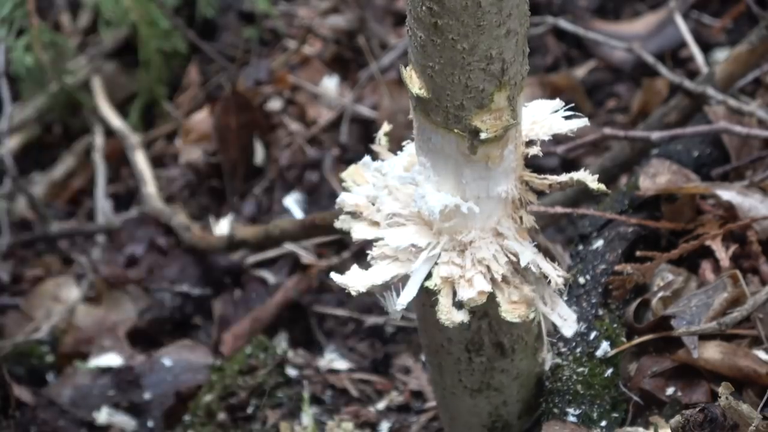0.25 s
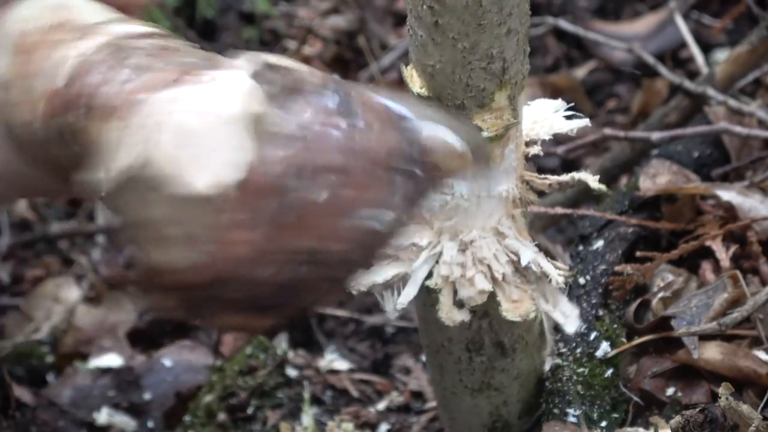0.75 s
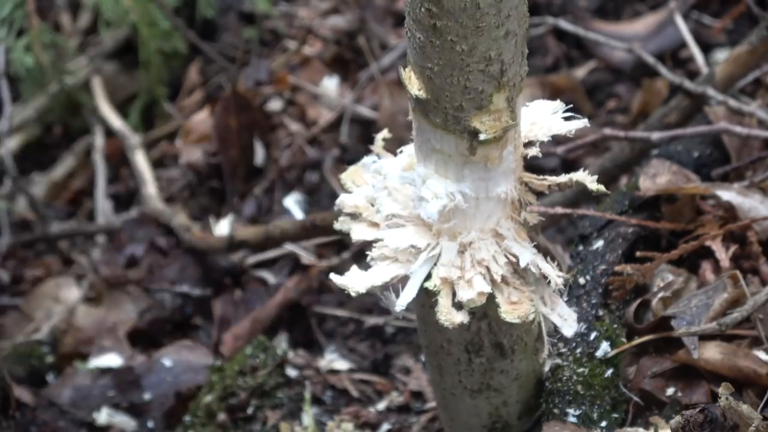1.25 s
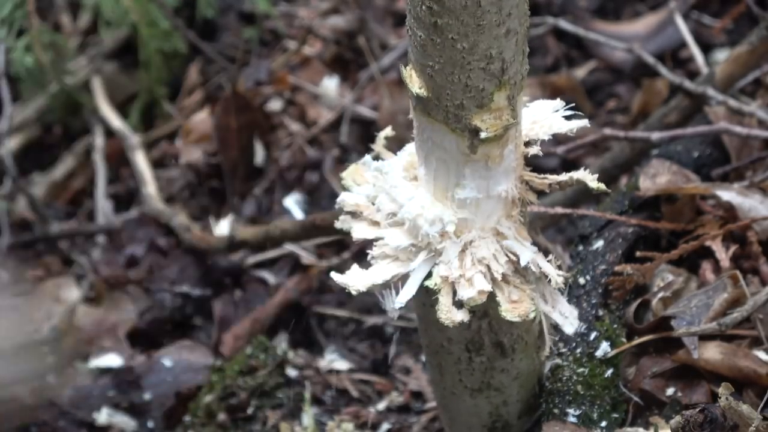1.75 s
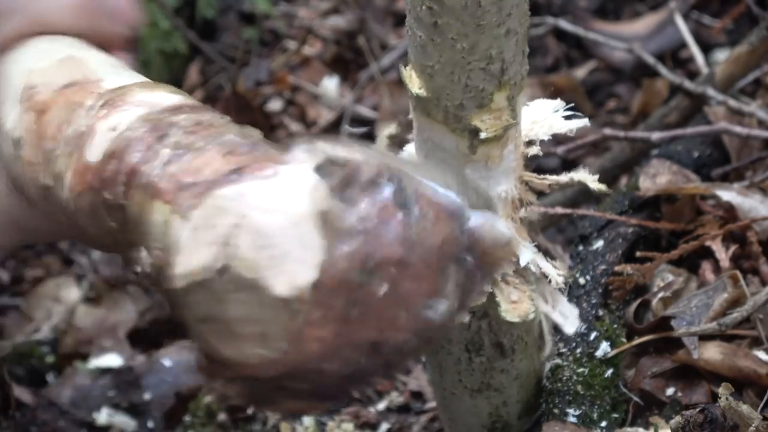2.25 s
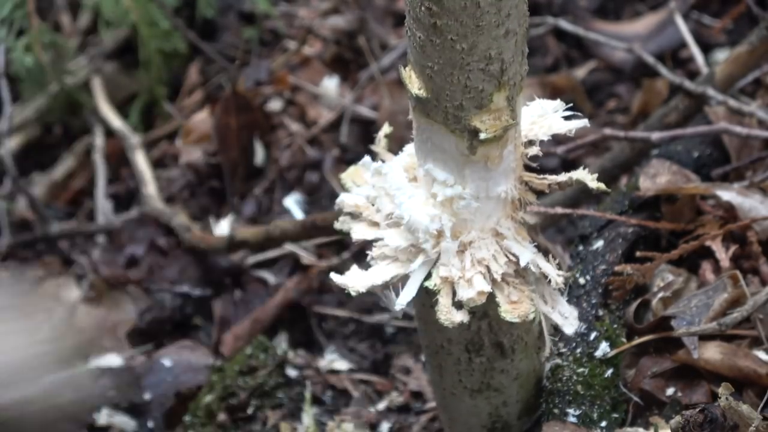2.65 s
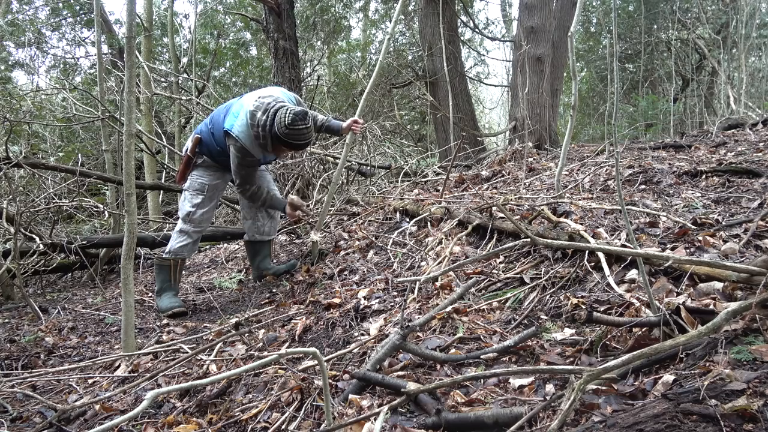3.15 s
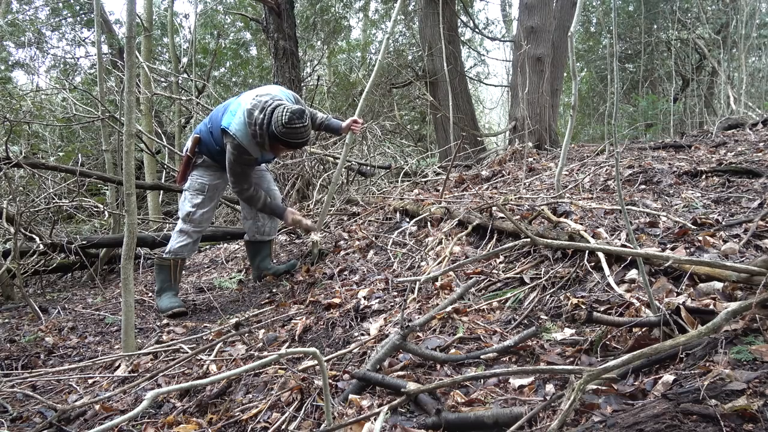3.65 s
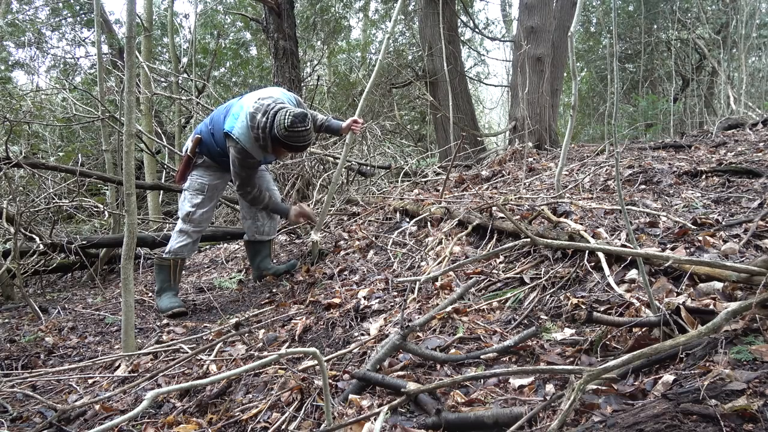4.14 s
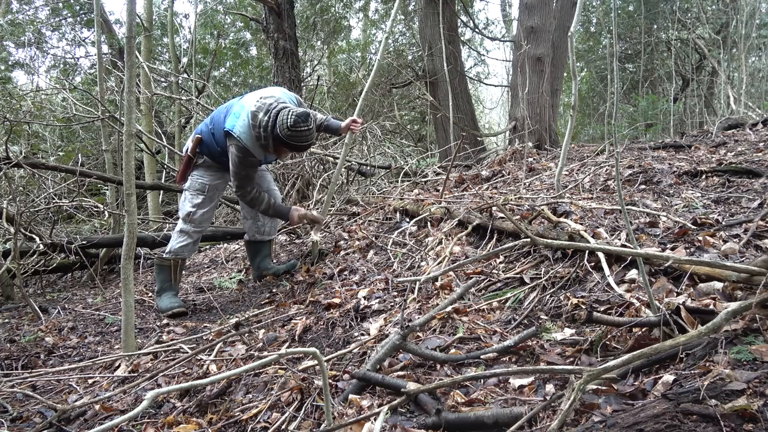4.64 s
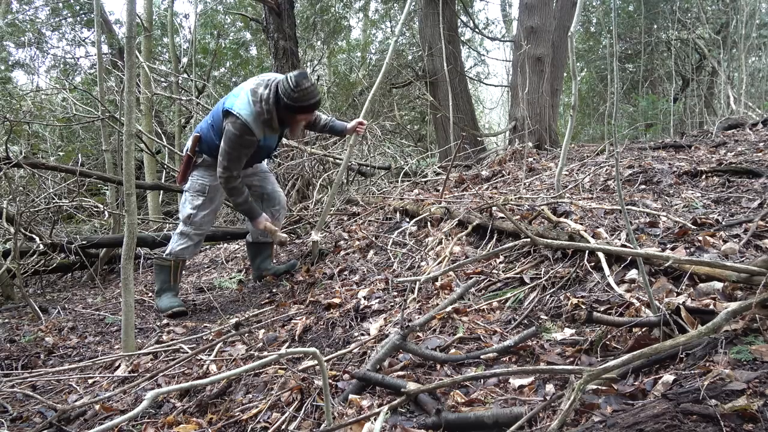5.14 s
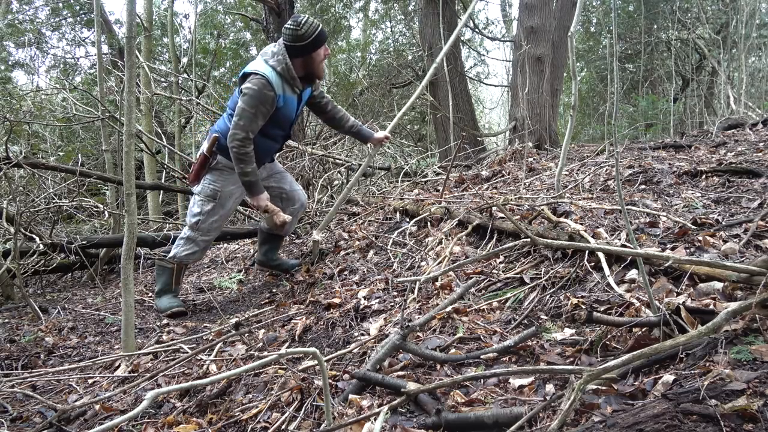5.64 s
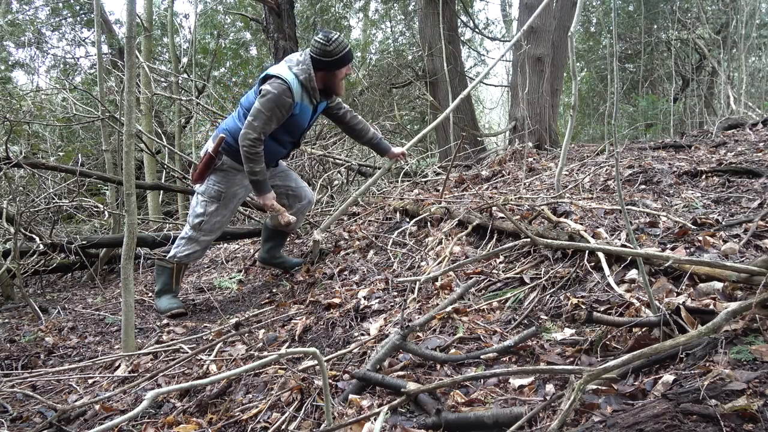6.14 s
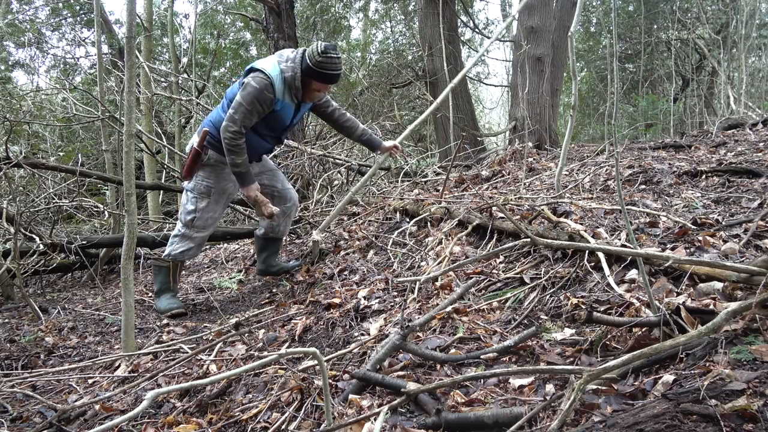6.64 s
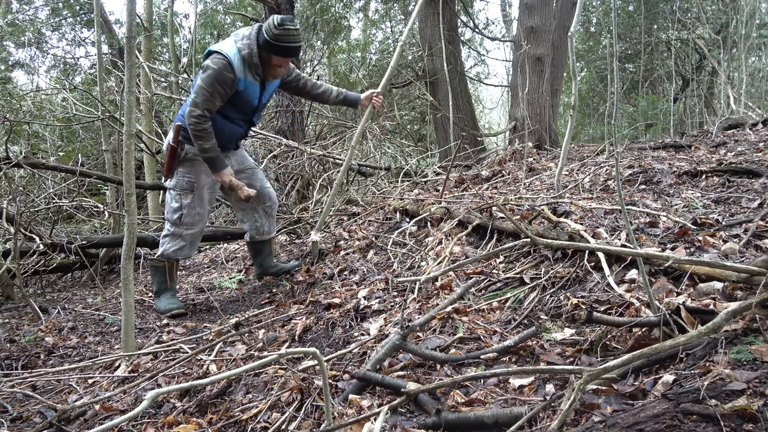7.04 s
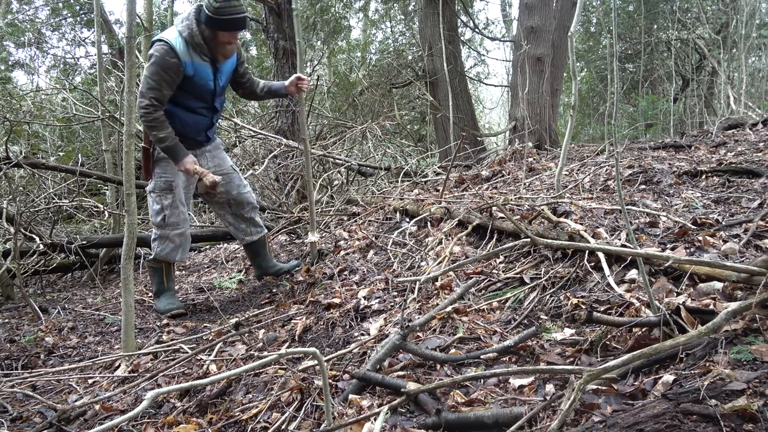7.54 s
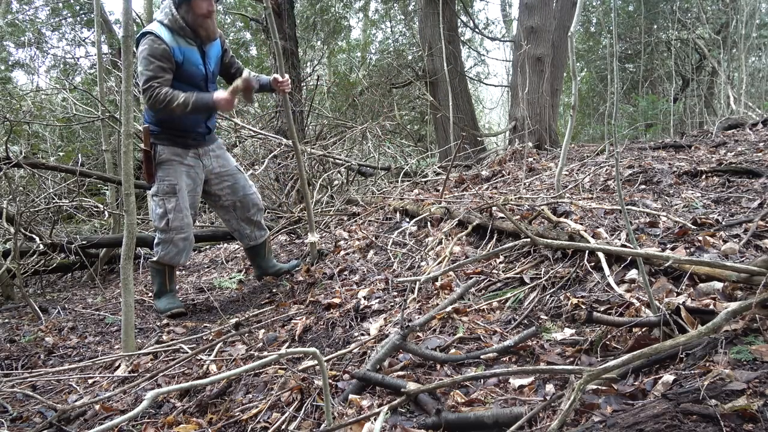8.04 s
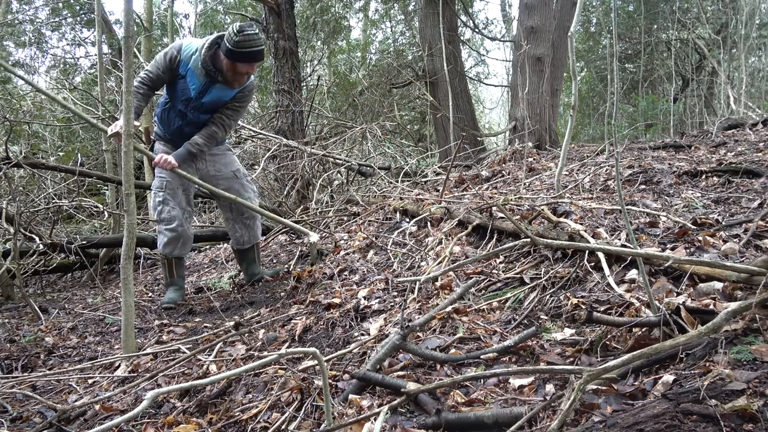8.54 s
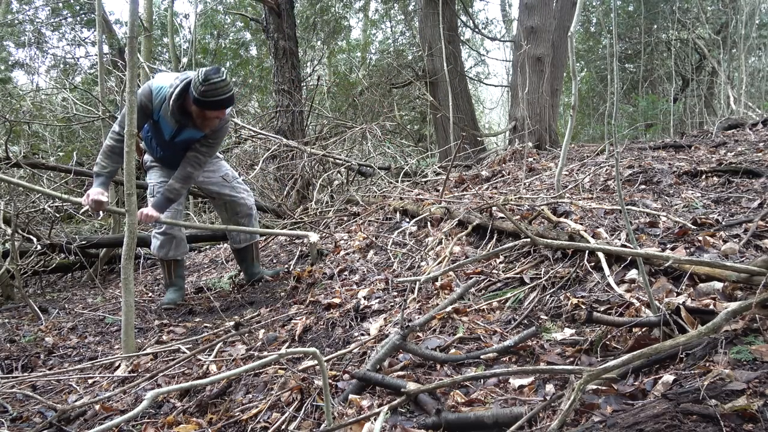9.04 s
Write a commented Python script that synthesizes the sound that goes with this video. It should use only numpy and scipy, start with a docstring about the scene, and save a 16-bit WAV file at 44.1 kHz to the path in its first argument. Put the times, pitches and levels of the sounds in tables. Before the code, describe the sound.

Quiet woodland with low rumble and faint hiss. From 0 to 3 s a stone axe chops a green sapling very close, opening on the tail of an earlier blow: ten hard, dull-bright wooden knocks about 0.3 s apart, clipping the microphone, each followed by a brief tree echo, slight twig shiver and a boomy low thump through the ground and stand. At about 3.1 s the view cuts further away, on another tail; six lighter, more distant knocks follow at the same pace from 3.3 to 4.9 s. From 5 s the stem is bent: quiet rustle and gritty fibre creaks, small ticks near 6 s, a sharp crack at 6.27 s, then a lull. From 6.9 s rustling surges, with strong snaps near 7.2 and 7.6 s, heavy branches swishing around 8 s, clustered crackles at 8.5-9 s and a final crisp snap at 9.24 s.

```python
"""Woodland: a stone axe chops a green sapling, ten blows up close, then six from further off after a cut.
Decaying sines make the knocks and ground waves in the microphone stand; fading noise, the trunks' echoes.
Resonant noise bursts are twigs shaken by the chopping, then fibres and twigs snapping as the stem is bent;
grains creak and patchy noise rustles as brush. Low filtered noise rumbles beneath.
One microphone feeds both channels; close blows overload it."""
import sys
import numpy as np
from scipy import signal
from scipy.fft import rfft, irfft, next_fast_len
from scipy.io import wavfile
from scipy.ndimage import uniform_filter1d, map_coordinates

SR = 44100
rng = np.random.default_rng(int(sys.argv[2]) if len(sys.argv) > 2 else 0)


def transcribe(signal):
    """Save signal, clipped to [-1, 1], as a 16-bit WAV file at the path in sys.argv[1]."""
    frames = np.atleast_2d(signal).T
    limited = np.clip(frames, -1, 1)
    pcm = np.round(limited * 32767).astype(np.int16)
    wavfile.write(sys.argv[1], SR, pcm)


N = 409688

# Woodland noise spectrum: (frequency [Hz], relative density [dB/Hz])
AIR_SPECTRUM = [(13, -53), (22, -36), (38, -8.5), (60, 1.5), (161, -3), (250, -15.5), (295, -18.5),
                (696, -19), (969, -22.5), (3180, -35), (6170, -39), (14900, -39.5), (16200, -45)]
# Rumble before its random drift: (time [s], level [dB])
RUMBLE_LEVEL = [(0.0, -35), (2.9, -34), (3.1, -38.5), (4.2, -38.5), (5.4, -42.5), (7.2, -45.5), (8, -37),
                (8.5, -42), (9.29, -45)]
# Faint steady tone of the far view, before its waver: (frequency [Hz], level [dB])
FAR_TONE = [(236, -51)]
# Bending: (time [s], movement [dB], treble [dB], heavy branches [dB], creak re movement [dB])
BENDING = [(5.0, -52, -66, -56, -8), (5.25, -56, -72, -62, -10), (5.55, -58, -72, -66, -5),
           (5.6, -50, -65, -58, 3), (5.85, -50, -63, -48, 4), (6.11, -47, -54, -50, 2),
           (6.2, -56, -60, -60, -5), (6.55, -63, -68, -64, -10), (6.87, -58, -70, -64, -15),
           (6.91, -45, -64, -49, -8), (7.04, -52, -62, -54, -15), (7.16, -33, -53, -42, -12),
           (7.23, -44, -64, -49, -15), (7.3, -29, -45, -45, -15), (7.51, -42, -60, -46, -12),
           (7.64, -31, -47, -43, -5), (7.93, -39, -53, -37, -5), (8.1, -33, -57, -32, -3),
           (8.19, -43, -66, -33, -5), (8.5, -41, -53, -36, 0), (8.8, -38, -46, -41, 0),
           (8.99, -36, -43, -38, -3), (9.22, -48, -48, -46, -10), (9.29, -44, -41, -48, -10)]
# Rustle spectra of twigs, treble and heavy branches: (frequency [Hz], relative density [dB/Hz])
TWIG_SPECTRUM = [(530, -48), (900, -3), (951, -11.5), (1310, 2), (1840, 4), (2290, 3.5), (2460, 2),
                 (3450, 3.5), (6790, -19.5), (8000, -19.5), (10400, -39), (17600, -120)]
TREBLE_SPECTRUM = [(3530, -11), (6000, -3), (10400, -15.5), (15000, -15), (16200, -27)]
LIMB_SPECTRUM = [(59, -38), (100, -0.5), (331, 0), (568, -7), (784, -7), (1200, -10.5), (1560, -15),
                 (2640, -120)]
# Short bursts: shaken twigs during the chopping, then fibres and twigs breaking:
# (time [s], relative level [dB], pitch [Hz], click re burst [dB], thud re burst [dB], burst t60 [s])
SHORT_BURSTS = [(1.2111, -17, 1990, -35, -12, .028), (1.488, -22, 3320, -31, -19, .078),
                (1.9235, -30, 3400, -30, -30, .03), (2.1216, -17, 2200, -32, -16, .073),
                (2.2318, -32, 2930, -25, -16, .063), (2.6753, -8, 2080, -45, -10, .022),
                (2.7357, -10, 2000, -40, -16, .045), (3.1043, -20, 2290, -27, -9, .047),
                (3.4194, -16, 2450, -14, -10, .031), (3.9265, -25, 2520, -24, -15, .049),
                (4.6286, -9, 2560, -42, -38, .045), (5.5707, -27, 3000, -33, -17, .08),
                (5.693, -27, 3340, -33, -23, .031), (5.7523, -23, 3160, -31, -20, .044),
                (5.8207, -25, 3300, -24, -19, .043), (5.8775, -30, 3490, -12, -17, .04),
                (5.9174, -23, 3550, -27, -12, .019), (5.9564, -13, 3170, -42, -17, .022),
                (6.0102, -25, 3110, -22, -24, .035), (6.0606, -25, 3100, -30, -10, .053),
                (6.1863, -31, 3220, 4, -30, .043), (6.1984, -29, 2900, -5, -29, .035),
                (6.2397, -34, 2900, 10, -21, .021), (6.2687, 1, 3470, -17, -31, .05),
                (6.9002, -28, 1580, -33, -25, .097), (6.9825, -22, 2900, -29, -17, .033),
                (7.1177, -18, 1720, -28, -26, .06), (7.1616, -6, 4330, -15, -39, .027),
                (7.1876, -15, 2780, -35, -16, .05), (7.2549, -19, 1840, -32, -31, .066),
                (7.2994, -16, 2280, -30, -14, .08), (7.3582, -15, 3440, -33, -22, .041),
                (7.4051, -17, 2960, -25, -24, .035), (7.433, -15, 2560, -25, -20, .037),
                (7.5288, -20, 2040, -29, -23, .044), (7.5502, -13, 2610, -33, -23, .044),
                (7.6026, 4.5, 3390, -28, -32, .024), (7.8166, -16, 2900, -36, -20, .055),
                (7.8765, -16, 2250, -32, -22, .053), (7.8994, -28, 2740, -14, 8, .05),
                (7.9239, -21, 3090, -20, -19, .037), (7.9813, -8, 3000, -28, -13, .06),
                (8.0311, -7, 1800, -30, -16, .06), (8.0591, -9, 2920, -34, -24, .045),
                (8.094, -3, 2920, -36, -30, .03), (8.1105, -2, 1900, -36, -22, .035),
                (8.1344, -14, 2700, -36, -20, .08), (8.2038, -29, 1350, -33, 12, .05),
                (8.332, -24, 3290, -32, -25, .035), (8.3984, -11, 1600, -24, -8, .11),
                (8.5355, -13, 3590, -10, -16, .038), (8.5939, -8, 3600, -20, -7, .06),
                (8.6727, -18, 2760, -23, -23, .052), (8.6894, -22, 2350, -17, -5, .025),
                (8.7324, -21, 2460, -4, -15, .036), (8.7465, -16, 3270, -4, -32, .034),
                (8.7554, -18, 3890, -3, -15, .034), (8.7829, -15, 2330, -14, -12, .047),
                (8.8074, -15, 2260, -14, -22, .024), (8.8294, -25, 2480, -3, -20, .035),
                (8.8574, -24, 2590, -3, -23, .035), (8.8867, -20, 3080, -8, -16, .035),
                (8.9077, -15, 3310, -12, -13, .066), (8.9715, -9, 2810, -2, -17, .06),
                (8.9894, -9, 2720, -23, -17, .026), (9.0917, -24, 2760, 2, -16, .035),
                (9.1488, -29, 2940, -11, -6, .035), (9.198, -32, 2240, -14, -18, .035),
                (9.2409, 6, 4220, -16, -32, .014), (9.2594, -23, 2200, -22, -12, .062)]
# Decay of the woods' answer to a short burst: (frequency [Hz], t60 [s])
WOODS_DECAY = [(500, 0.083), (3500, 0.54), (12000, 0.31)]
# Axe blows; each view opens on the tail of an earlier one: (time [s], relative knock [dB],
# relative echo [dB], crown [dB], ground [dB], bite: treble up and bass down [dB])
AXE_BLOWS = [(-0.18, -4, -13, -31, -14.5, 8), (0.148, 0, -16.5, -36, -14.5, -0.5),
             (0.467, 0, -16, -28.5, -13, 1.5), (0.785, 0, -15.5, -31, -11.5, -0.2),
             (1.095, 1.5, -17.5, -30, -12, -0.8), (1.395, 1.5, -16.5, -31.5, -14, -1.5),
             (1.698, 1.5, -18, -38, -14.5, 0), (2.005, 0.5, -16.5, -28.5, -12, -0.7),
             (2.295, 0, -17, -34.5, -14, 1.3), (2.608, -1, -17, -27, -12, 3.2),
             (2.923, -0.5, -16.5, -27.5, -11, 2), (3.03, -2, -14, -30, -25, 6),
             (3.336, 2, -9, -29.5, -21.5, 9), (3.648, 1, -9.5, -27, -21.5, 8.5),
             (3.965, -2.5, -12.5, -31, -22, 1), (4.277, 0, -11.5, -36.5, -30.5, 4),
             (4.585, -2, -13, -39, -35.5, 0), (4.885, -1, -14.5, -36, -23, 4.5)]
# Stone on stem, partials: (frequency [Hz], relative level [dB], t60 [s])
NEAR_PARTIALS = [(324, -19, 0.01), (630, -9.5, 0.017), (1133, -2, 0.012), (1627, 10.5, 0.0053),
                 (2150, -6, 0.0073), (2968, -3, 0.0071), (4560, -24.5, 0.0038), (5950, -8.5, 0.005),
                 (8100, -42.5, .004)]
FAR_PARTIALS = [(260, -16.5, 0.019), (520, -8, 0.0103), (856, 0.5, .01), (1230, -3.5, 0.003),
                (1534, -10.5, 0.022), (2205, -11, 0.013), (4500, -43.5, 0.0029), (8500, -32, .004)]
# Trunks answering a blow, before its bite: (frequency [Hz], relative density [dB/Hz])
NEAR_ECHO_SPECTRUM = [(150, -22), (250, 26), (343, 2), (693, 2), (1010, 8), (2550, -9.5), (2920, -9.5),
                      (4450, -28), (4870, -37.5), (9000, -46), (11700, -71), (19800, -120)]
FAR_ECHO_SPECTRUM = [(88, -33), (150, -7), (226, 8), (790, -1), (1090, -5), (1620, -4.5), (1890, -3.5),
                     (2060, -6.5), (2910, -16.5), (9000, -50), (11700, -65), (19800, -120)]
# Decay of that answer: (frequency [Hz], t60 [s])
NEAR_ECHO_DECAY = [(300, 0.48), (1100, 0.24), (3000, 0.3), (8000, 0.3)]
FAR_ECHO_DECAY = [(300, 0.31), (1100, 0.21), (3000, 0.25), (8000, .15)]
# Ground waves in the stand: (frequency [Hz], arrival [s], rise [s], relative level [dB], t60 [s])
NEAR_GROUND = [(79.7, 0.026, 0.0085, 10.5, 0.14), (46.3, 0.0219, 0.044, 0.5, 0.46),
               (296.3, 0.047, 0.005, -5.5, 0.073), (210, 0.025, 0.014, -6.5, 0.24),
               (138.6, 0.0222, 0.024, -5.5, 0.38), (169, 0.025, 0.0086, -4.5, 0.27),
               (123.7, 0.082, 0.0056, 5.5, 0.13), (89.7, 0.12, 0.012, -3.5, .45)]
FAR_GROUND = [(54.7, 0.03, 0.0068, -7.5, 0.83), (77.7, 0.0036, 0.0033, 0, 0.29),
              (138.3, 0.0102, 0.018, -6, .4), (202, 0.0113, 0.016, -27, 0.12)]
# Crown and crushed fibres: (frequency [Hz], relative density [dB/Hz])
CROWN_SPECTRUM = [(290, -12), (500, -9), (668, 2), (750, -6.5), (819, -7), (1300, 3), (3150, 0.5),
                  (3920, -5.5), (8580, -23.5), (16000, -41)]
# Crown shiver: (peak [s], rise [dB/doubling of time], fall [dB/s], settling level [dB], settling fall [dB/s])
NEAR_SHIVER = (.06, 9, 190, -16, 35)
FAR_SHIVER = (.065, 5, 140, -24, 70)
# Difference between channels: (frequency [Hz], gain of the quadrature part [dB])
CHANNEL_DIFFERENCE = [(30, -29), (80, -33.5), (300, -19), (700, -32), (1400, -71), (3000, -65.5),
                      (6000, -47), (14000, -23)]

CUT_S, CLOSE_COUNT = 3.1, 11  # change of view; blows belonging to the close one
SNAP_WIDTH = 0.65  # resonance width / pitch
SHAKE_DB, SHAKE_T60_S = -34, 0.3  # rustle of twigs after a short burst, re its table level; heard from 5 s on
CREAK_HZ, SURGE_DB = 3200, 2  # slipping fibres; scale of random surges in movement
TOP_HZ = 16300  # band limit


def amp(db):
    """Decibels to amplitude ratio."""
    return np.exp(np.asarray(db) * np.log(10) / 20)


def unit(x):
    """Scales to rms 1."""
    return x / np.sqrt(np.mean(x ** 2) + 1e-20)


def along(points, hz):
    """Interpolates (frequency [Hz], value) points on a log axis."""
    f, v = np.transpose(points)
    return np.interp(np.log(hz + 1), np.log(f + 1), v)


def filtered(x, response):
    """Applies a frequency response, with padding against wrap-around."""
    m = next_fast_len(x.shape[-1] + min(8192, x.shape[-1] // 2))
    spectrum = rfft(x, m) * response(np.fft.rfftfreq(m, 1 / SR))
    return irfft(spectrum, m)[..., :x.shape[-1]]


def add(track, at_s, sound):
    """Mixes in a sound, also one that began before zero."""
    at = round(at_s * SR)
    part = sound[max(-at, 0):max(N - at, 0)]
    track[max(at, 0):][:len(part)] += part


def wobble(rate_hz, size=N):
    """Smooth random curve through rate_hz knots a second."""
    knots = rng.standard_normal(int(size * rate_hz / SR) + 4)
    return map_coordinates(knots, [np.arange(size) * rate_hz / SR])


def rustle(spectrum, patchy_db, grit_db, size=N):
    """Leaves and bark touching: rms-1 coloured noise, patchy in time and pitch, with fine grit."""
    gritty = amp(grit_db * wobble(700, size)) * rng.standard_normal(size)
    z = signal.stft(gritty, nperseg=256)[2]
    field = uniform_filter1d(rng.standard_normal(z.shape), size=9, axis=0)
    field = uniform_filter1d(field, size=4, axis=1)
    patches = signal.istft(z * amp(patchy_db * unit(field)), nperseg=256)[1][:size]
    return unit(filtered(patches, lambda hz: amp(along(spectrum, hz))))


def dying(decay, spectrum, noise, close_db, close_s):
    """Echoes: each frequency dies at its own speed; the closest trunks are louder until about close_s."""
    hz, t, z = signal.stft(noise, SR, nperseg=256)
    gain = amp(along(spectrum, hz))[:, None]
    closeness_db = close_db * np.exp(-(t / close_s) ** 4)
    fall_db = closeness_db - 60 * t / along(decay, hz)[:, None]
    echo = signal.istft(z * gain * amp(fall_db), SR, nperseg=256)[1][:len(noise)]
    return echo / np.sqrt(np.mean(gain ** 2))


def woodland():
    """Distant noise split into drifting rumble and steady hiss; a wavering tone joins after the cut."""
    t = np.arange(N) / SR
    air = filtered(rng.standard_normal(N), lambda hz: amp(along(AIR_SPECTRUM, hz)))
    low = filtered(air, lambda hz: 1 / (1 + (hz / 280) ** 4))
    rumble_db = np.interp(t, *np.transpose(RUMBLE_LEVEL)) + 1.76 * wobble(6)
    rumble = amp(rumble_db) * unit(low)
    hiss = amp(-51.5) * unit(air - low)
    waver = np.cumsum(wobble(14)) / SR
    tone = sum(amp(db + 2 * wobble(9)) * np.sin(2 * np.pi * (hz * t + 3 * waver))  # wanders by a few Hz
               for hz, db in FAR_TONE)
    return rumble + hiss + (t > CUT_S) * tone


def creaks(pitch_hz, spread, life_s, scatter_db, length, count=1800, size=350):
    """Slipping fibres: short decaying sines scattered around a pitch, rms 1 overall."""
    when, tone = rng.random(count), rng.standard_normal(count)
    big, side = rng.exponential(size=count), rng.random(count)
    at = (when * length).astype(int)
    ratio = np.where(side < 0.15, 0.5, np.where(side > 0.88, 1.5, 1))  # some slips ring lower or higher
    hz = pitch_hz * np.exp(spread * tone) * ratio
    t = np.arange(size) / SR
    strength = amp(scatter_db * np.minimum(big, 3))
    envelope = np.exp(-t / life_s) * (1 - np.exp(-t / 0.00033))
    grains = strength[:, None] * np.sin(2 * np.pi * hz[:, None] * t) * envelope
    places = at[:, None] + np.arange(size)
    return unit(np.bincount(places.ravel(), grains.ravel(), length)[:length])


def brush():
    """The bent stem creaks and drags twigs through undergrowth from 5 s; each short burst from then on adds a
    fading rustle."""
    s, *columns = np.transpose(BENDING)
    start = round(s[0] * SR)
    size, t = N - start, np.arange(N) / SR
    move_db, treble_db, limbs_db, creak_db = (np.interp(t[start:], s, c) for c in columns)
    move = amp(move_db + SURGE_DB * wobble(18, size))
    shaken = np.zeros(N)
    settling = amp(SHAKE_DB - 60 * t[:SR // 2] / SHAKE_T60_S)
    for at_s, db, *_ in SHORT_BURSTS:
        add(shaken, at_s, amp(db) * settling)
    fibres = creaks(CREAK_HZ, spread=0.11, life_s=0.0022, scatter_db=3.5, length=size)
    twigs = (move + shaken[start:]) * rustle(TWIG_SPECTRUM, patchy_db=4.5, grit_db=1.5, size=size)
    treble = amp(treble_db) * rustle(TREBLE_SPECTRUM, patchy_db=4, grit_db=5, size=size)
    limbs = amp(limbs_db) * rustle(LIMB_SPECTRUM, patchy_db=2.5, grit_db=0.5, size=size)
    return np.pad(twigs + treble + limbs + amp(creak_db) * move * fibres, (start, 0))


def ringing_noise(envelope, hz, width_hz):
    """Noise under an envelope through a squared resonance, scaled by the rms of steady noise through it."""
    def resonance(f):
        return (1j * f * width_hz / (hz * hz - f * f + 1j * f * width_hz)) ** 2

    noise = rng.standard_normal(len(envelope))
    plain, shaped = filtered(np.array([noise, noise * envelope]), resonance)
    return shaped / np.std(plain)


def snaps():
    """Shaken or breaking twigs: a sharp click, a pitched noise burst and a dull thud; the woods echo them."""
    out, t = np.zeros(N), np.arange(SR // 10) / SR
    for at_s, db, pitch_hz, click_db, thud_db, t60_s in SHORT_BURSTS:
        fall = amp(-60 * t / t60_s)
        splinter = fall * (1 - np.exp(-t / 0.00063)) + 0.81 * amp(-60 * t / 0.0012)
        burst = ringing_noise(splinter, pitch_hz, SNAP_WIDTH * pitch_hz)
        click = ringing_noise(amp(-60 * t / 0.004) + 0.53 * fall, 8500, 11000)
        thud = ringing_noise(amp(-40 * t / t60_s), 550, 900)  # dies slower than the burst
        add(out, at_s, amp(db - 6) * (burst + amp(click_db) * click + amp(thud_db) * thud))
    spectrum = [(20, 5), (1500, -6), (3500, -17.5), (16000, -5)]  # (frequency [Hz], relative density [dB/Hz])
    tail = dying(WOODS_DECAY, spectrum, rng.standard_normal(SR // 2), close_db=6, close_s=0.024)
    delayed = np.pad(out, (300, 0))
    return out + amp(-5.5) * signal.fftconvolve(delayed, tail / np.linalg.norm(tail))[:N]


def shiver(t, peak_s, rise_db, fall_db_per_s, settle_db, settle_db_per_s):
    """Crown envelope: swells as the blow climbs the stem, dies fast, then settles slowly."""
    rising = amp(rise_db * np.log2(np.clip(t / peak_s, 0.01, 1)))
    late = np.maximum(t - peak_s, 0)
    return rising * (amp(-fall_db_per_s * late) + amp(settle_db - settle_db_per_s * late))


def stem_knock(t, partials, bite):
    """Stone on stem: decaying sines, slightly varied per blow, plus noise of fibres crushed by the edge."""
    vary = rng.normal(0, [[1], [0.015]], (2, len(partials)))  # level [dB], relative pitch
    ring = sum(amp(db + bite(hz) + more_db - 60 * t / t60_s) * np.sin(2 * np.pi * hz * (1 + off) * t)
               for (hz, db, t60_s), more_db, off in zip(partials, *vary))
    crushed = rustle(CROWN_SPECTRUM, patchy_db=2.0, grit_db=-1.5, size=len(t))
    return ring + 0.23 * amp(-60 * t / 0.019) * crushed


def ground_waves(t, modes):
    """Ground waves shake the stand: delayed sines that swell and decay."""
    waves = np.zeros(len(t))
    for hz, arrival_s, rise_s, db, t60_s in modes:
        late = np.maximum(t - arrival_s, 0)
        swell = 1 - np.exp(-(late / rise_s) ** 2)
        level = amp(db + rng.normal(0, 1) - 60 * late / t60_s)
        waves += level * swell * np.sin(2 * np.pi * hz * late)
    return waves


def chopping(blows, partials, echo, decay, ground, sway, drive_db, gap_s, close_db):
    """Each blow knocks the stem, echoes off trunks, shakes the crown and sends waves through the ground."""
    out, t = np.zeros(N), np.arange(SR * 2 // 5) / SR
    trunks = rng.standard_normal(len(t))  # trees stand still: much the same echo every blow
    for at_s, knock_db, echo_db, crown_db, ground_db, bite_db in blows:
        def bite(hz):  # edge blow brighter, flat blow duller
            return bite_db * np.tanh(np.log2(hz / 1200))

        knock = stem_knock(t[:SR // 20], partials, bite)
        spectrum = [(hz, db + bite(hz)) for hz, db in echo]
        noise = unit(trunks + 0.85 * rng.standard_normal(len(t)))
        answer = dying(decay, spectrum, noise, close_db, close_s=0.027)
        answer = answer * (1 - np.exp(-(t / gap_s) ** 2))  # first echoes take a few ms
        leaves = shiver(t, *sway) * rustle(CROWN_SPECTRUM, patchy_db=3.0, grit_db=2.0, size=len(t))
        add(out, at_s, amp(knock_db + drive_db) * knock)
        add(out, at_s, amp(echo_db - close_db) * answer)
        add(out, at_s, amp(crown_db) * leaves + amp(ground_db) * ground_waves(t, ground))
    return out


def scene():
    """Close blows, far ones after the cut; snaps join while chopping, brush from 5 s; woodland throughout."""
    close = chopping(AXE_BLOWS[:CLOSE_COUNT], NEAR_PARTIALS, NEAR_ECHO_SPECTRUM, NEAR_ECHO_DECAY,
                     NEAR_GROUND, NEAR_SHIVER, drive_db=6, gap_s=0.0075, close_db=0.5)
    wide = chopping(AXE_BLOWS[CLOSE_COUNT:], FAR_PARTIALS, FAR_ECHO_SPECTRUM, FAR_ECHO_DECAY,
                    FAR_GROUND, FAR_SHIVER, drive_db=0, gap_s=0.0052, close_db=9.5)
    first = np.clip((CUT_S - np.arange(N) / SR) / 0.006, 0, 1)
    blows = first * close + (1 - first) * wide
    return np.tile(blows + snaps() + brush() + woodland(), (2, 1))


def record(dry):
    """Peaks clip at the converter's ceiling; a faint quadrature part splits the channels; band-limited."""
    clipped = np.clip(dry, -1, 1)
    side = filtered(clipped[0], lambda hz: 1j * amp(along(CHANNEL_DIFFERENCE, hz)))
    return np.clip(filtered(clipped + [side, -side], lambda hz: hz < TOP_HZ), -1, 1)


dry = scene()
out = record(dry)
transcribe(out)
```